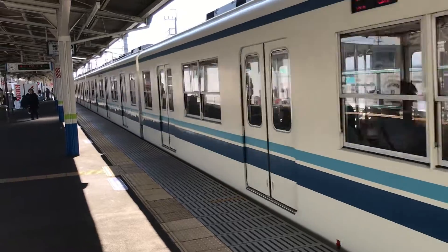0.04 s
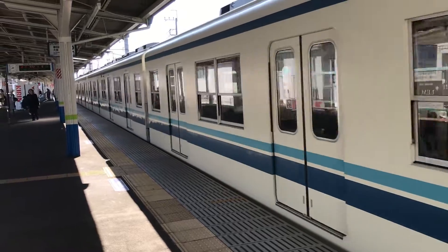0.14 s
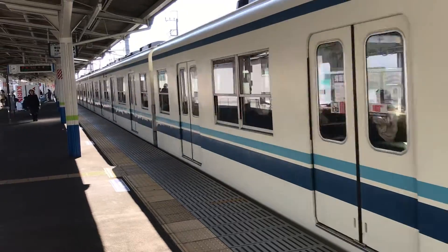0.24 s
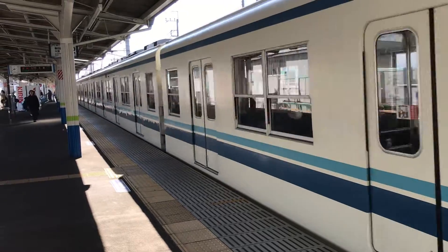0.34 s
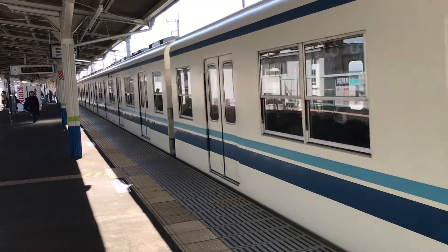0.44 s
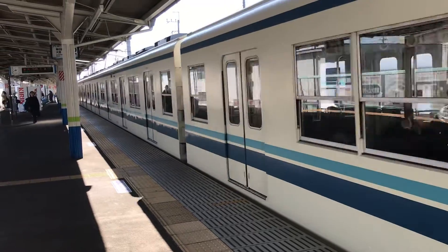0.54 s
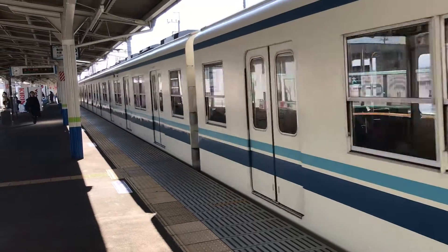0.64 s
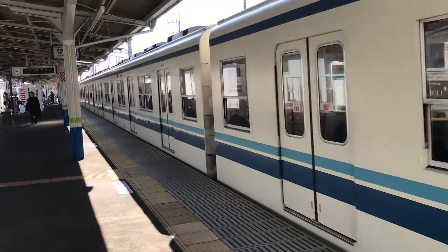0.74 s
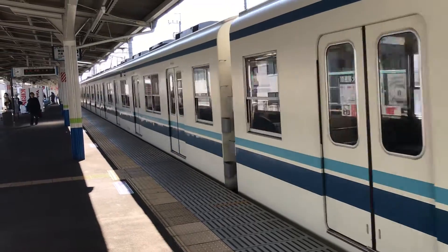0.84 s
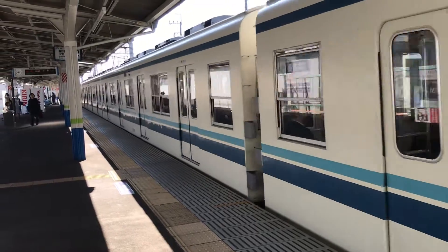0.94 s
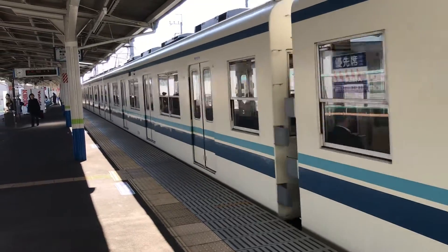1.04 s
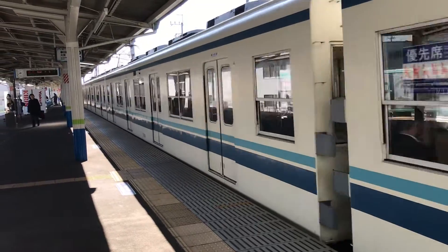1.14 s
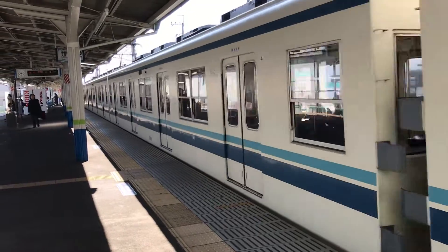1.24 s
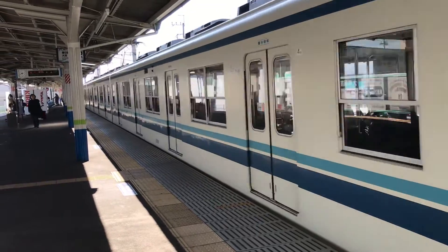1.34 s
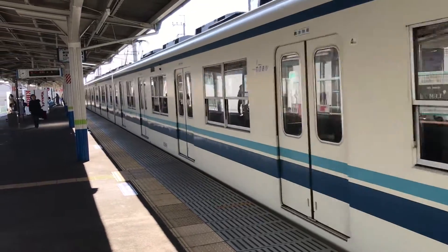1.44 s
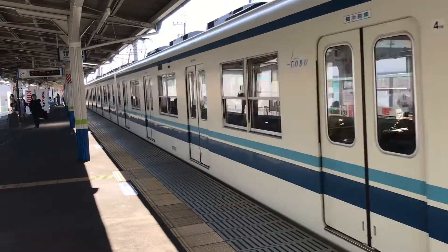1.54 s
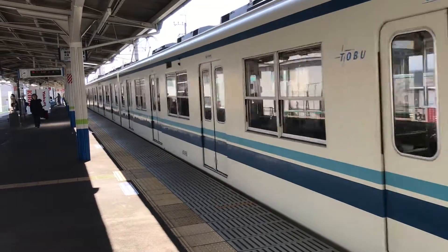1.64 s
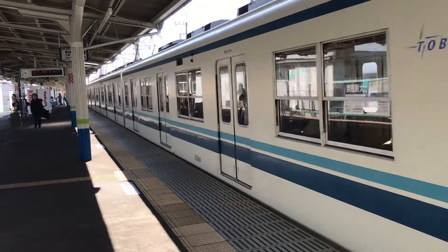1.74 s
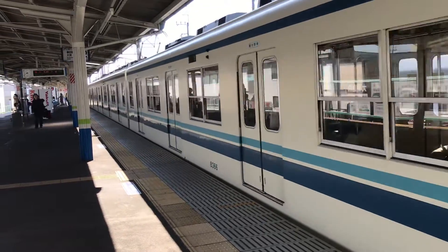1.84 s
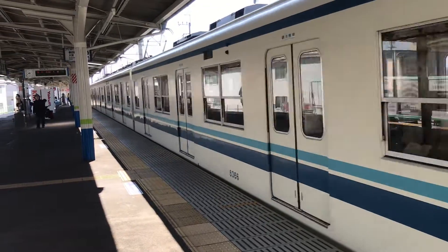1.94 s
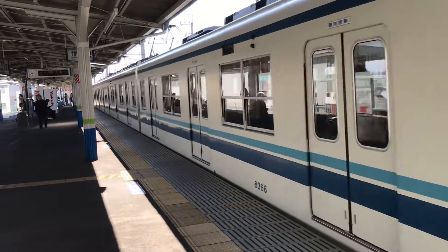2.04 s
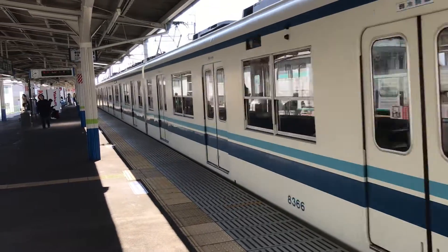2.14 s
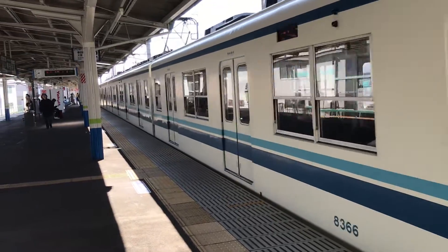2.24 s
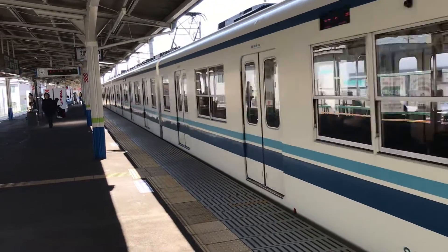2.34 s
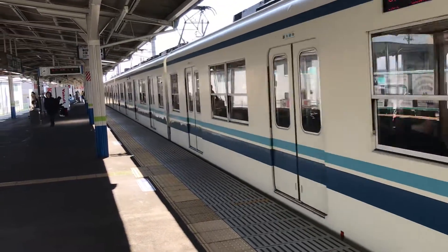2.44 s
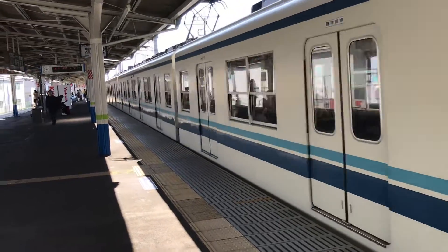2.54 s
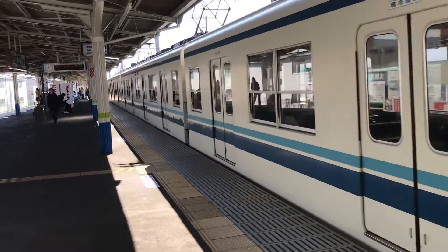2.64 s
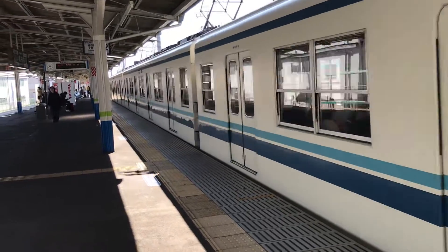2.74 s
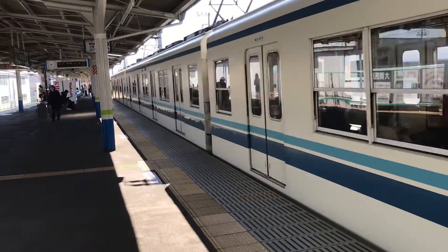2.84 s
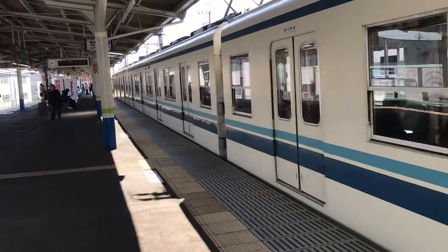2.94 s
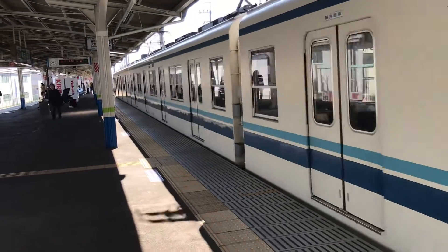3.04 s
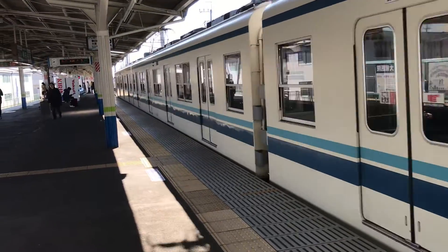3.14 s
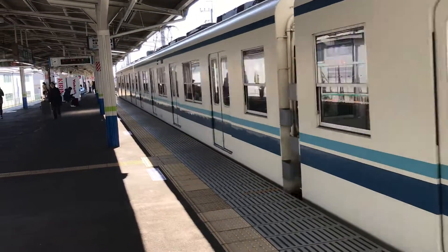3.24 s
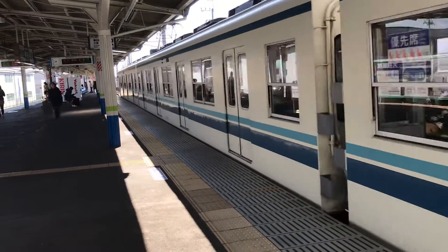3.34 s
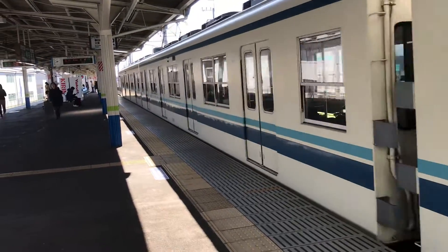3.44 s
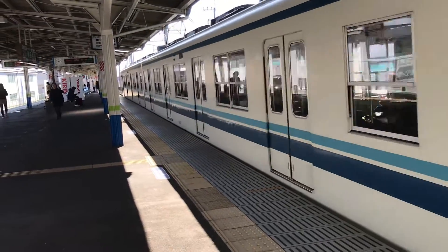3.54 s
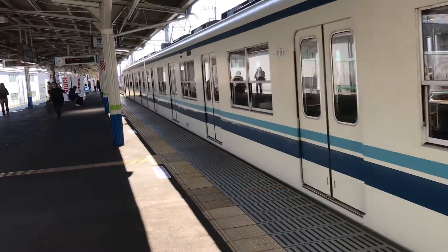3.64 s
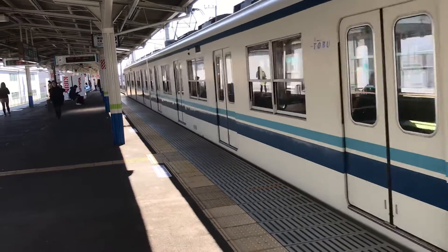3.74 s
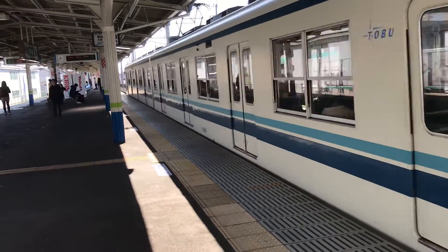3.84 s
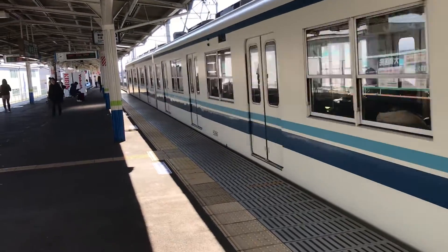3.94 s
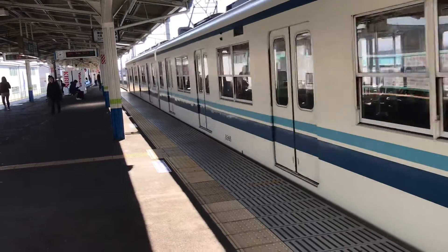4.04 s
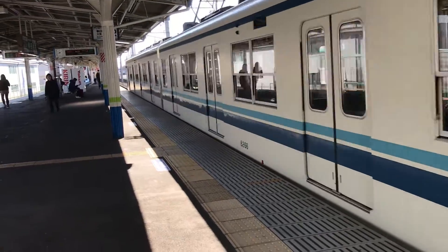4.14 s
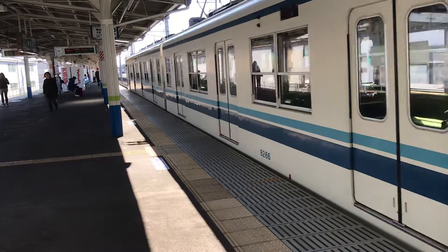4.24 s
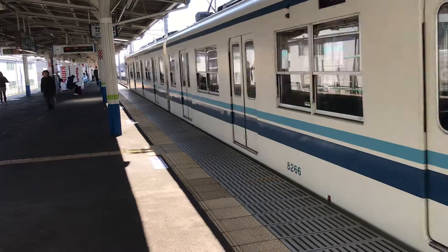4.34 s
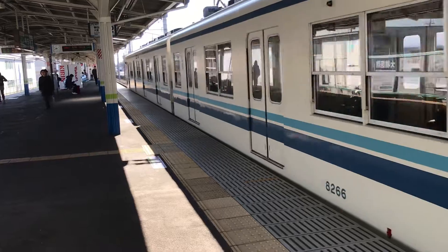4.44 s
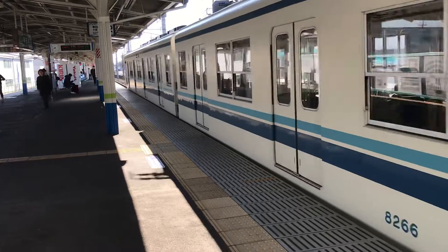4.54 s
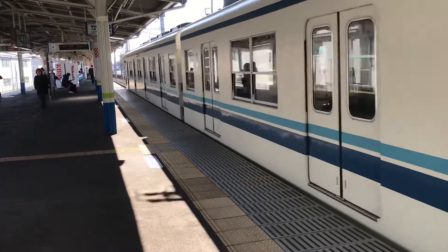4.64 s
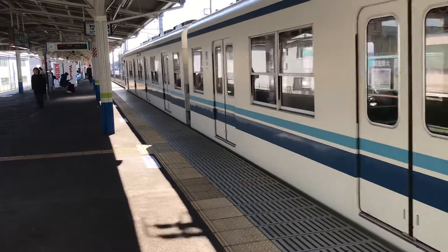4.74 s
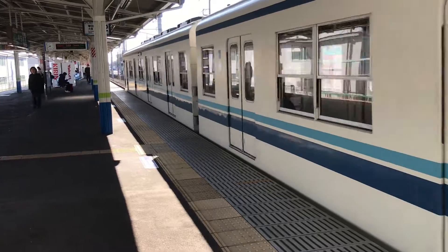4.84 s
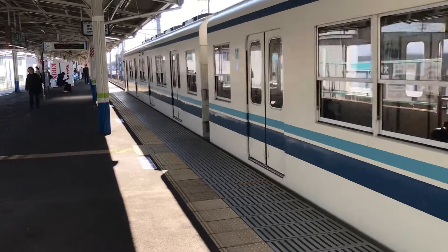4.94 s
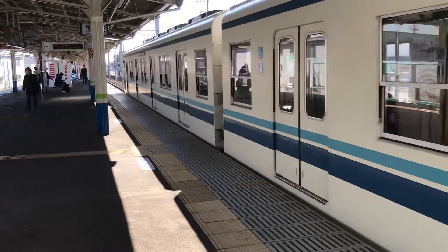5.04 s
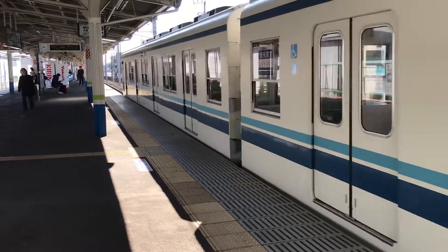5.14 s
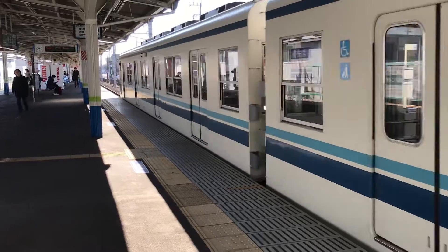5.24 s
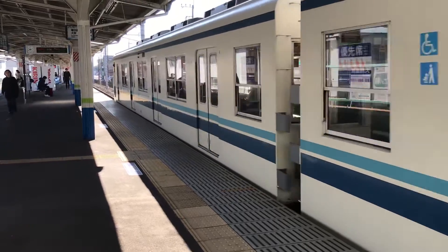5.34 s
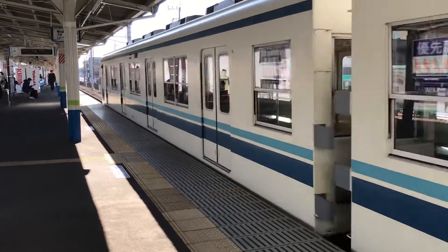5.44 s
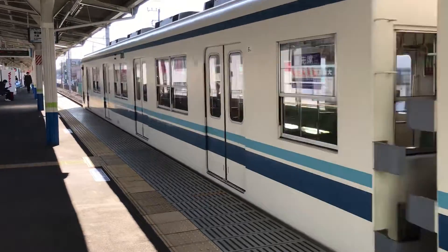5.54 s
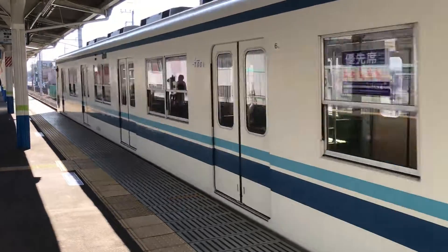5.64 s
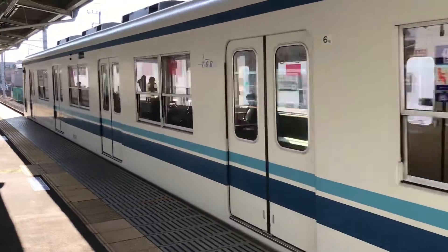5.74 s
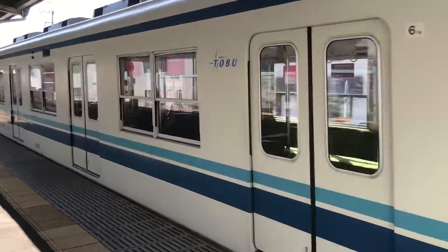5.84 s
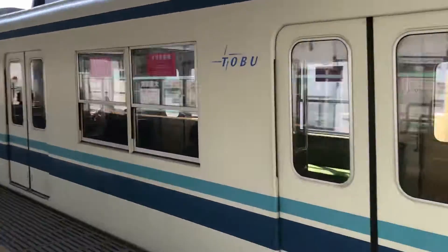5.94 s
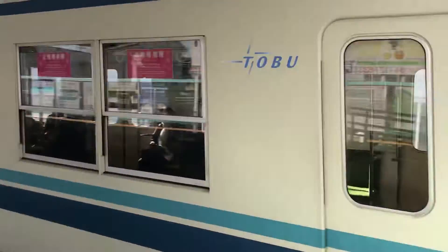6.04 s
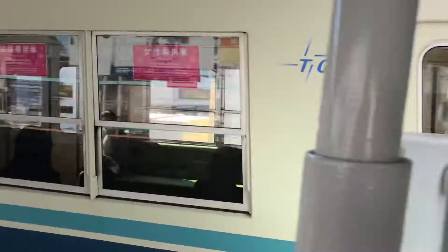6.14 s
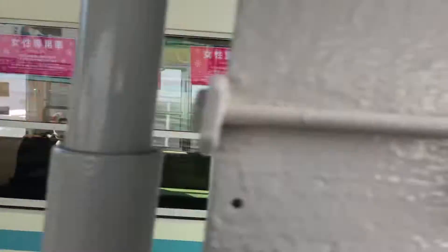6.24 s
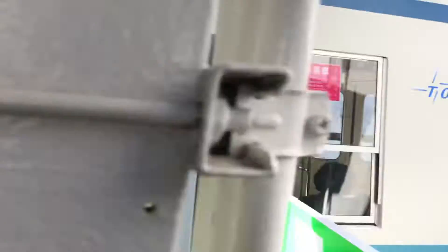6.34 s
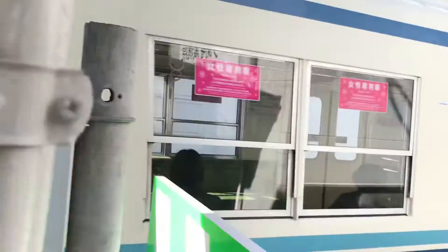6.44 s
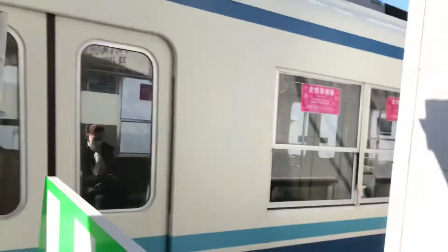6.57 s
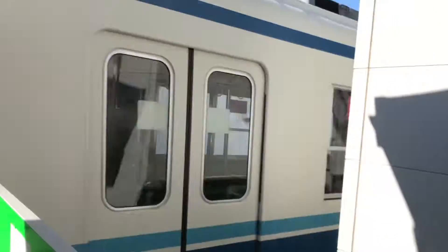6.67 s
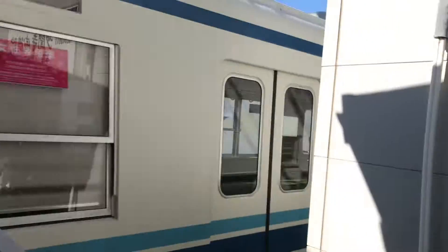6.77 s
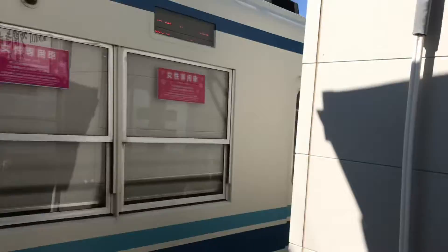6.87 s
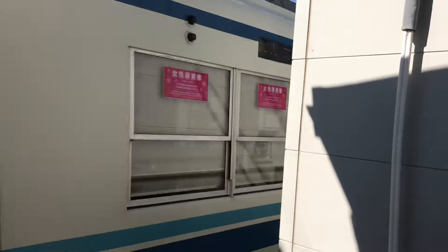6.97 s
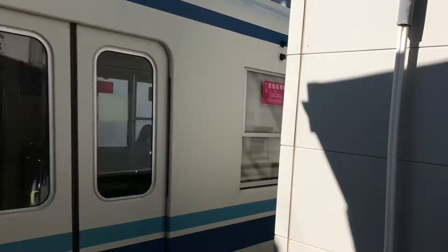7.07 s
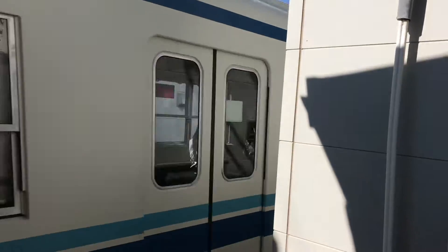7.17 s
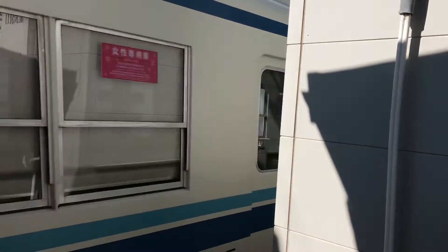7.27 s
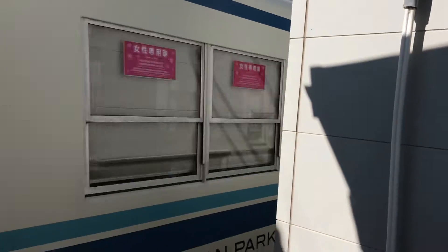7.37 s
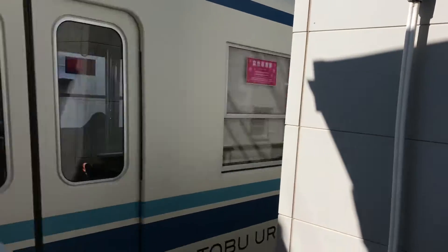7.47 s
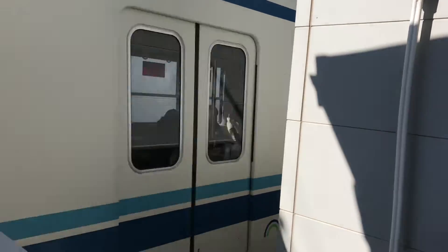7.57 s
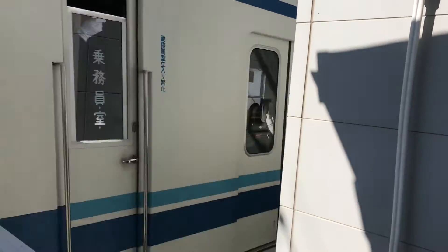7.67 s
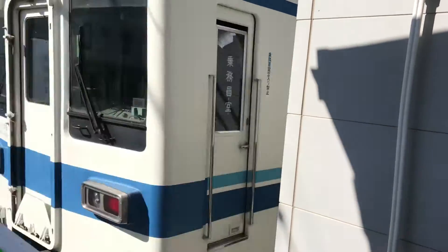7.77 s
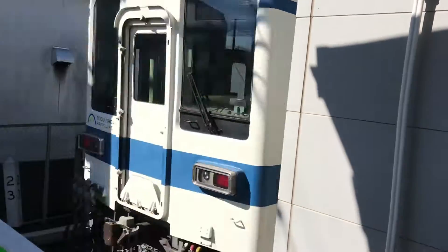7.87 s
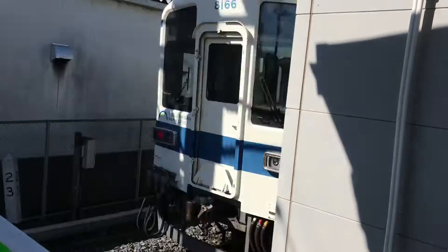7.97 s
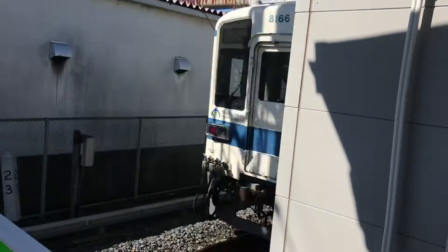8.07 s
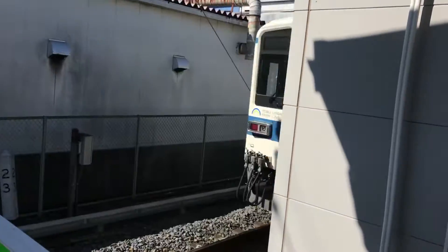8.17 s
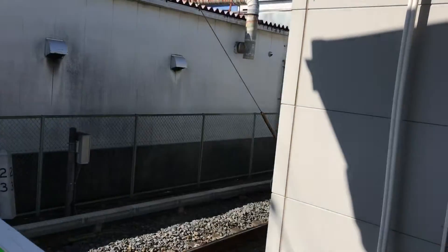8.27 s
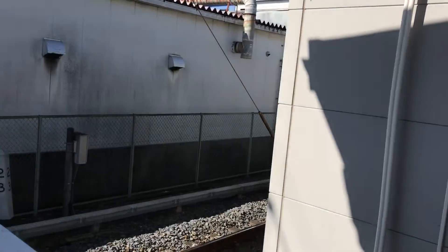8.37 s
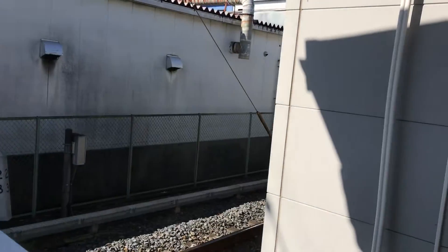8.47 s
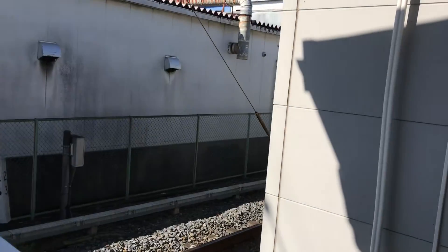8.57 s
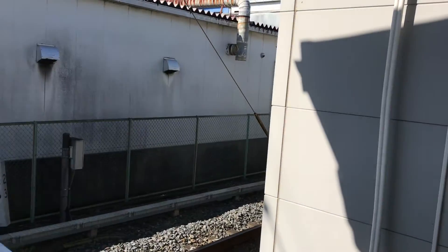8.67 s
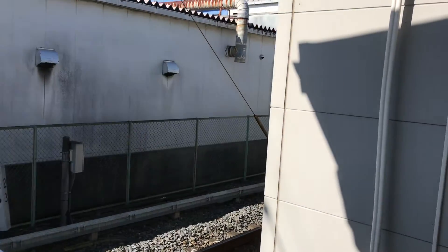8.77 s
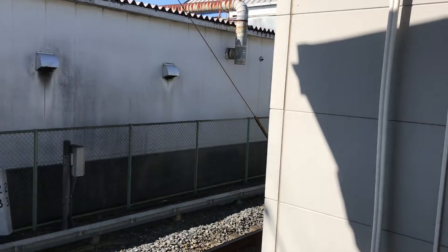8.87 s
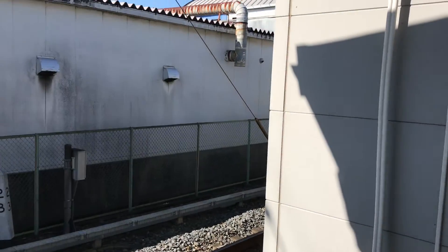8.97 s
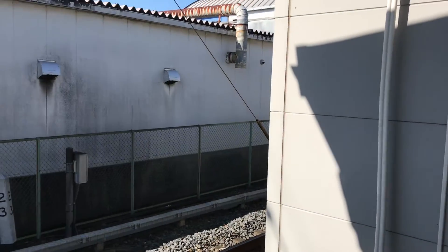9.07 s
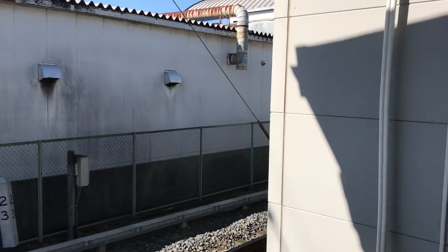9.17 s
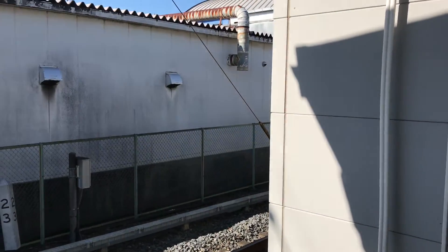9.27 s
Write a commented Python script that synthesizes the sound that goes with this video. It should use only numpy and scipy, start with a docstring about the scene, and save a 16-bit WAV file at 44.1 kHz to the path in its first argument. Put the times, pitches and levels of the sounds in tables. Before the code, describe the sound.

Heard close to the track on a roofed platform, an electric train accelerates past. A low, wavering motor hum climbs and swells with each passing motor. Wheels roar and hiss while axles knock hollowly over a joint in uneven clusters, with short echoes, thuds and rattles. The sound grows louder and boomier beside a wall, then the last car leaves and the rolling noise fades.

```python
"""On a roofed platform, close to the track, an electric commuter train gathers speed and passes.
Motor and gear lines are wavering sines that climb together; wheel roar, body boom and rail hiss
are coloured noises. Each axle knocks over a rail joint: struck resonances with echoes, then noise
for clatter, thud and rattle. Filtered noise makes the flange, loose-metal and wall sounds.
The last car goes by and the train fades away."""
import sys
import numpy as np
from scipy import signal
from scipy.fft import rfft, irfft, next_fast_len
from scipy.io import wavfile

SR = 44100
rng = np.random.default_rng(int(sys.argv[2]) if len(sys.argv) > 2 else 0)


def to_wav(sig):
    """Store sig (one row per channel, or 1-D mono) as 16-bit WAV at the path in sys.argv[1].

    Samples outside -1..1 are clipped; the rate is SR.
    """
    pcm = np.clip(np.atleast_2d(sig), -1, 1) * 32767
    pcm = np.round(pcm).astype(np.int16)
    wavfile.write(sys.argv[1], SR, pcm.T)  # frames by channels


N = 410571
TIME = np.arange(N) / SR  # s


def from_db(db):
    """Decibels to gain."""
    return 10 ** (np.asarray(db) / 20)


def rms_one(x):
    """Scale to rms 1."""
    return x / np.sqrt(np.mean(x ** 2) + 1e-20)


def in_time(rows):
    """Draw each column of an automation table as a curve over every sample."""
    s, *columns = np.transpose(rows)
    return [np.interp(TIME, s, c) for c in columns]


def drift(rate):
    """Slow random modulation of rms near 1; a higher rate moves faster."""
    step = 100  # samples between control points
    pole = np.exp(-2 * np.pi * rate * step / SR)
    points = rng.standard_normal(N // step + 1002)
    slow = signal.lfilter([1], [1, -2 * pole, pole * pole], points)[1000:]  # skip the filter's start
    return np.interp(np.arange(N) / step, np.arange(len(slow)), rms_one(slow))


def noise(spectrum):
    """Noise of rms 1, coloured by a spectrum drawn on a log frequency axis."""
    hz, level_db = np.transpose(spectrum)
    size = next_fast_len(N)
    bins_hz = np.maximum(np.arange(size // 2 + 1) * SR / size, 1)
    gain = from_db(np.interp(np.log(bins_hz), np.log(hz), level_db, left=-150, right=-150))
    white = rfft(rng.standard_normal(size))
    return rms_one(irfft(white * gain, size)[:N])


def resonance(x, hz, width_hz):
    """A band-pass resonance with steep skirts."""
    edges = np.clip([hz - width_hz / 2, hz + width_hz / 2], 20, .45 * SR)
    return signal.sosfilt(signal.butter(2, edges, "band", fs=SR, output="sos"), x)


def dull(x):
    """Take off the treble above about 3 kHz."""
    treble_top_hz = 3130
    return signal.sosfilt(signal.butter(6, treble_top_hz, fs=SR, output="sos"), x)


def add(out, s, sound):
    """Mix a sound in at time s."""
    i = max(int(s * SR), 0)
    out[i:i + len(sound)] += sound[:max(N - i, 0)]


def swell(s, half):
    """A bell-shaped (Gaussian) envelope around time s."""
    return np.exp(-np.minimum(((TIME - s) / half) ** 2 / 2, 60))


def nearness(s, half):
    """Gain of a source that goes by at time s, down to one half after half seconds."""
    return 1 / (1 + ((TIME - s) / half) ** 2)


# Fader moves of the rolling noise, before trims
# columns: start_s [s], roar_db [dB], boom_db [dB], hiss_db [dB], rumble_db [dB]
ROLLING_LEVELS = [(0, -26, -33, -46, -37.5), (2.1, -27, -36.5, -44.5, -38.5), (3.1, -25.5, -33.5, -44, -37),
                  (4.3, -26, -37, -44, -36.5), (5.6, -26.5, -29.5, -42.5, -39),
                  (6.3, -22, -25.5, -37, -35.5), (7.15, -24, -27.5, -38.5, -37),
                  (8.1, -25, -30, -41.5, -34.5), (8.4, -29, -37, -44, -39.5),
                  (9.31, -30, -39.5, -43, -43.5)]
# Colour of the deep rumble; columns: pitch_hz [Hz], level_db [dB per Hz]
RUMBLE_SPECTRUM = [(20, -38.5), (30, -21.5), (45, -10), (60, -2.5), (75, 2.5), (95, -2), (120, -15),
                   (200, -27.5)]
# Colour of the car-body boom; columns: pitch_hz [Hz], level_db [dB per Hz]
BOOM_SPECTRUM = [(70, -26), (105, -6), (135, 2.5), (170, -0.5), (220, -4), (290, -3.5), (370, -5.5),
                 (440, -15), (520, -17.5), (800, -49)]
# Colour of the wheel roar; columns: pitch_hz [Hz], level_db [dB per Hz]
ROAR_SPECTRUM = [(150, -36), (230, -10.5), (380, -7.5), (470, -9), (530, -5.5), (585, 1.5), (650, 1.5),
                 (720, -6), (800, -8.5), (900, -13), (1000, -14), (1150, -23), (1350, -26.5), (2000, -62.5)]
# Colour of the rail hiss; columns: pitch_hz [Hz], level_db [dB per Hz]
HISS_SPECTRUM = [(700, -18.5), (1100, -12.5), (1280, -7.5), (1480, 0.5), (1680, -5), (1950, -0.5),
                 (2250, -2.5), (2750, -0.5), (3050, -9.5), (3400, -15.5), (3800, -29), (4300, -26),
                 (4900, -41.5), (6000, -60)]
# Colour of the fine air hiss on top; columns: pitch_hz [Hz], level_db [dB per Hz]
AIR_SPECTRUM = [(3000, -8), (5000, -4), (5700, -0.5), (7000, 0), (7700, -3.5), (8300, -3), (9500, -4.5),
                (10400, -10.5), (11300, -9), (13000, -13), (15700, -18.5)]


def rolling(roar_db, boom_db, hiss_db, rumble_db):
    """Rough treads shake the car bodies, set wheels and rail roaring and hiss at the contact."""
    load = drift(20)  # uneven treads press harder and softer
    rumble = noise(RUMBLE_SPECTRUM) * from_db(rumble_db + 0.5 + 1.3 * drift(5.4))
    boom = noise(BOOM_SPECTRUM) * from_db(boom_db + 2.0 + 2.0 * drift(12))
    roar = noise(ROAR_SPECTRUM) * from_db(roar_db - 1.02 + 1.3 * load + 0.27 * drift(30))
    hiss = noise(HISS_SPECTRUM) * from_db(hiss_db - 2.05 + 0.97 * load)
    # the fine air hiss takes a small share of the rail hiss's swing
    air_db = -74.5 + .15 * (hiss_db - hiss_db.mean())
    air = noise(AIR_SPECTRUM) * from_db(air_db + .6 * load)
    return rumble + boom + roar + hiss + air


def tone(hz, waver, flutter_db, blur):
    """Waver and flutter suggest motors at almost one speed; reflections smear part of the line."""
    phase = 2 * np.pi * np.cumsum(hz * (1 + waver * drift(11.56))) / SR
    direct = np.sin(phase) * from_db(flutter_db * drift(14))
    reflected = drift(22) * np.sin(phase) + drift(19) * np.cos(phase)
    return rms_one(direct + blur * reflected)


# Motor whine, climbing with the speed; columns: start_s [s], pitch_hz [Hz]
WHINE_PITCH = [(0, 250.6), (1, 268.5), (2.7, 286.3), (3.95, 314.5), (4.7, 315.5), (6.4, 346.3),
               (9.31, 355.4)]
# The whine swells as each motor goes by; columns: peak_s [s], level_db [dB]
MOTOR_SWELLS = [(.55, -38), (1.7, -30.5), (2.33, -24.5), (3.1, -29.5), (3.8, -28.5), (4.6, -25),
                (5.35, -27), (6.1, -28)]
# Gear and fan lines, each swelling once
# columns: multiple [times the whine pitch], level_db [dB], peak_s [s]
GEAR_AND_FAN_LINES = [(.8, -39, .3), (2.645, -36, 2.1), (3.02, -38.5, 1.6), (2, -29, 2.6),
                      (2.68, -36.5, 3.3), (.86, -37, 4.1), (1.1, -34, 4.05), (1.22, -33.5, 4.1),
                      (1.22, -33, 5.8), (2.7, -40, 5.2)]


def motors():
    """Whine, gear and fan lines climb together with the train's speed and swell as they pass."""
    hz, = in_time(WHINE_PITCH)
    power = sum((from_db(level_db) * nearness(s, half=.35)) ** 2 for s, level_db in MOTOR_SWELLS)
    out = np.sqrt(power) * tone(hz, waver=.007, flutter_db=2.5, blur=.42)
    for multiple, line_db, s in GEAR_AND_FAN_LINES:
        line = tone(multiple * hz, waver=.007, flutter_db=3, blur=.6)
        out += from_db(line_db) * nearness(s, half=.8) * line
    return out


# Flange scrapes on the rail
# columns: peak_s [s], level_db [dB], half_s [s], width_hz [Hz], top_db [dB, bright top]
FLANGE_SCRAPES = [(7.153, -31.5, 0.021, 2200, -59), (7.975, -40.5, .28, 700, -76.5),
                  (8.167, -38.5, 0.021, 1200, -73), (8.698, -40.5, 0.094, 900, -75)]
# Wheel modes set singing by a flange
# columns: peak_s [s], level_db [dB], pitch_hz [Hz], half_s [s]
SINGING_WHEELS = [(0.025, -46, 1910, .028), (0.324, -42.5, 1900, .02), (.421, -37, 1956, .016),
                  (0.464, -45, 2736, 0.048), (0.757, -52, 2760, 0.028), (1.23, -41, 2430, .03),
                  (1.511, -50, 2460, 0.033), (5.534, -38, 1970, .03), (6.194, -35, 2080, 0.019),
                  (6.34, -37, 1970, 0.011), (6.446, -45.5, 2765, .14)]


def flanges():
    """A grazing flange scrapes, or briefly makes a wheel mode sing: friction noise in resonances."""
    scrape_hz, top_hz, ring_width_hz = 2564, 5450, 120
    out, friction = np.zeros(N), rng.standard_normal(N)
    top = rms_one(resonance(friction, top_hz, .4 * top_hz))
    for s, level_db, half, width_hz, top_db in FLANGE_SCRAPES:
        scrape = rms_one(dull(resonance(friction, scrape_hz, width_hz)))
        out += (from_db(level_db) * scrape + from_db(top_db) * top) * swell(s, half)
    for s, level_db, hz, half in SINGING_WHEELS:
        ring = rms_one(resonance(friction, hz, ring_width_hz))
        out += from_db(level_db) * ring * swell(s, half)
    return out


def blow(hz, width_hz, contact_hz):
    """A heavy, soft-edged impact on a damped resonance: a few cycles, peak 1."""
    impulse = signal.unit_impulse(SR // 10)
    push = signal.sosfilt(signal.butter(3, contact_hz, fs=SR, output="sos"), impulse)
    ring = resonance(push, hz, width_hz)
    return ring / np.abs(ring).max()


# Returns from platform edge, car side and roof; each delay varies a little from knock to knock
# columns: delay_s [s], level_db [dB relative to the knock]
KNOCK_ECHOES = [(.0135, -6), (.032, -12), (.06, -11.5)]


def knocks(times, peaks_db):
    """Each impact rings wheel and rail for a few cycles and comes back from the surfaces nearby."""
    out = np.zeros(N)
    chances = rng.standard_normal((len(times), len(KNOCK_ECHOES) + 1))
    for s, peak_db, chance in zip(times, peaks_db, chances):
        hz = 645 * (1 + 0.03 * chance[0])
        rail = blow(hz, 150, contact_hz=1060)
        wheel = from_db(-14.5) * blow(hz, 35, contact_hz=1000)  # less damped, rings on longer
        knock = from_db(peak_db) * (rail + wheel)
        add(out, s, knock)
        for (delay, echo_db), shift in zip(KNOCK_ECHOES, chance[1:]):
            add(out, s + delay * (1 + .06 * shift), from_db(echo_db) * knock)
    return out


# Placed light knocks of worn treads and bogie play; columns: start_s [s], level_db [dB, nominal peak]
LIGHT_KNOCKS = [(.309, -17.5), (3.929, -14.5), (4.244, -17), (6.167, -13.5), (6.937, -15.5)]


def treads(roar_db):
    """Worn treads and bogie play knock lightly; the random knocks follow the roar's level."""
    knocks_per_s, mean_db, spread_db = 1.2, -23, 4.5
    times = TIME[rng.random(N) < knocks_per_s / SR]
    peaks_db = mean_db + spread_db * rng.standard_normal(len(times))
    scattered = knocks(times, peaks_db) * from_db(roar_db - roar_db.mean())
    return knocks(*np.transpose(LIGHT_KNOCKS)) + scattered


def bursts(times, levels_db, lead, rise, t60, tail_db, tail_t60):
    """Envelope of impacts: a quick swell, a fast decay and a weak tail under the roof."""
    age, power = np.arange(SR // 2) / SR, np.zeros(N)
    after = np.maximum(age - rise, 0)
    decay = from_db(-60 * after / t60) ** 2
    tail = from_db(tail_db - 60 * after / tail_t60) ** 2
    shape = np.minimum(age / rise, 1) ** 2 * (decay + tail)
    for s, level_db in zip(times, levels_db):
        add(power, s - lead, shape * from_db(level_db) ** 2)
    return np.sqrt(power)


# Axles over the joint, two to a bogie, before trims
# columns: start_s [s], knock_db [dB, peak], clatter_db [dB]
AXLE_HITS = [(0.4145, -8, -18.5), (0.7006, -4.5, -19.5), (1.1959, -11.5, -18), (1.479, -8, -19.5),
             (2.768, -11, -17.5), (3.0264, -3.5, -24), (3.4641, -12, -16.5), (3.7117, -7.5, -15.5),
             (4.8643, -18, -16), (5.105, -2, -19), (5.5102, -1.5, -18), (5.7353, -3.5, -21.5),
             (5.9867, -8.5, -33), (6.2265, -7.5, -22), (6.4646, -7, -24), (6.7928, -4.5, -32),
             (7.0024, -9, -21.5), (7.3532, -13, -40), (7.912, -10, -35), (8.0199, -11, -30.5),
             (8.1328, -8.5, -21.5), (8.3622, -14.5, -42), (8.5848, -16, -43), (9.1848, -7.5, -27)]
# Colour of the clatter; columns: pitch_hz [Hz], level_db [dB per Hz]
CLATTER_SPECTRUM = [(170, -34), (260, -14), (420, -12), (520, -5), (590, 3), (645, 3.5), (720, -6.5),
                    (830, -12), (970, -8.5), (1150, -24.5), (1400, -40.5), (2200, -67)]


def rail_joints():
    """A wheel rattles into the gap, knocks on the next rail end, and bogie and body shake on."""
    times, knock_db, clatter_db = np.transpose(AXLE_HITS)
    # body thud and steel rattle take a share of the clatter's swing around a full clatter
    force_db = clatter_db + 15
    # once the last car has gone by, thuds and rattles get weaker by so many dB a second
    away_s = np.maximum(times - 8.5, 0)
    thud_db = -24 + .14 * force_db - 25 * away_s
    rattle_db = -35 + .15 * force_db - 13 * away_s
    # the rail end dips and shudders under the wheel just before the blow
    dip = bursts(times, knock_db - 13, lead=.026, rise=.022, t60=.076, tail_db=-21, tail_t60=.1)
    shake = bursts(times, clatter_db + .5, lead=.0019, rise=.012, t60=.4, tail_db=-12.5, tail_t60=.26)
    clatter = noise(CLATTER_SPECTRUM) * np.hypot(dip, shake)
    body = noise(RUMBLE_SPECTRUM) + from_db(4) * noise(BOOM_SPECTRUM)
    thud = body * bursts(times, thud_db, lead=.0031, rise=.016, t60=.26, tail_db=-20, tail_t60=.7)
    steel = noise(HISS_SPECTRUM) + from_db(-37) * noise(AIR_SPECTRUM)
    rattle = steel * bursts(times, rattle_db, lead=.02, rise=.024, t60=.3, tail_db=-20, tail_t60=.7)
    return knocks(times, knock_db - 2.5) + clatter + thud + rattle


def crack(hz, width_hz, t60):
    """A short dying noise burst through a steep resonance, peak 1."""
    age = np.arange(SR // 10) / SR
    burst = rng.standard_normal(len(age)) * from_db(-60 * age / t60)
    burst = resonance(resonance(burst, hz, width_hz), hz, width_hz)
    return burst / np.abs(burst).max()


# Loose fittings click
# columns: start_s [s], level_db [dB, peak before dulling], pitch_hz [Hz], edge_db [dB, bright edge]
LOOSE_CLICKS = [(2.599, -22.5, 2215, -64), (2.608, -15, 1470, -63), (7.288, -20.5, 1800, -62),
                (7.301, -24, 2900, -48), (7.609, -19, 1300, -52), (7.876, -34, 2600, -51)]


def fittings():
    """Loose metal clicks short and dry: a dulled noise crack with a thin bright edge."""
    out = np.zeros(N)
    for s, peak_db, hz, edge_db in LOOSE_CLICKS:
        body = from_db(peak_db) * dull(crack(hz, width_hz=.9 * hz, t60=.0078))
        edge = from_db(edge_db) * crack(6700, width_hz=3000, t60=.035)
        add(out, s, body + edge)
    return out


def wall_boom(hz=155, width_hz=90, level_db=-24, s=6.84, half=.25):
    """The gap between car side and station wall booms while a bogie passes it."""
    boom = rms_one(resonance(rng.standard_normal(N), hz, width_hz))
    return from_db(level_db) * boom * swell(s, half)


# Faint high sizzles as the last bogie leaves; columns: peak_s [s], level_db [dB]
HIGH_SIZZLES = [(8.36, -75), (8.58, -76)]


def sizzles():
    """Brief puffs of very high hiss: band-passed noise under bell envelopes."""
    hiss = rms_one(resonance(rng.standard_normal(N), hz=10700, width_hz=3000))
    return hiss * sum(from_db(level_db) * swell(s, half=.035) for s, level_db in HIGH_SIZZLES)


def scene():
    """The whole train as heard from the platform, in mono."""
    roar_db, boom_db, hiss_db, rumble_db = in_time(ROLLING_LEVELS)
    wheels = rolling(roar_db, boom_db, hiss_db, rumble_db) + flanges() + treads(roar_db) + rail_joints()
    return (wheels + motors() + fittings() + wall_boom() + sizzles())[None]


def record(dry):
    """A steep low-pass cuts the top."""
    cutoff_hz = 15700
    return signal.sosfilt(signal.ellip(10, .1, 80, cutoff_hz, fs=SR, output="sos"), dry)


dry = scene()
out = record(dry)
to_wav(out)
```